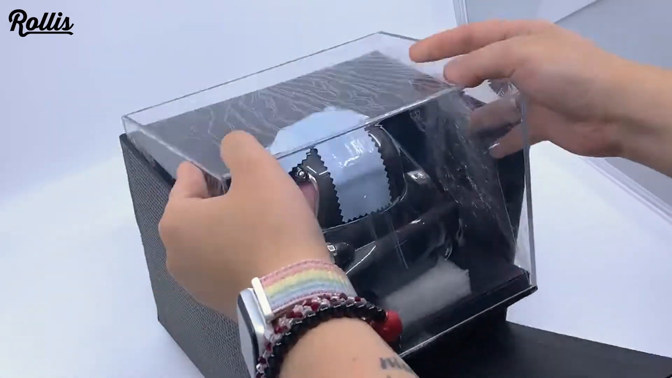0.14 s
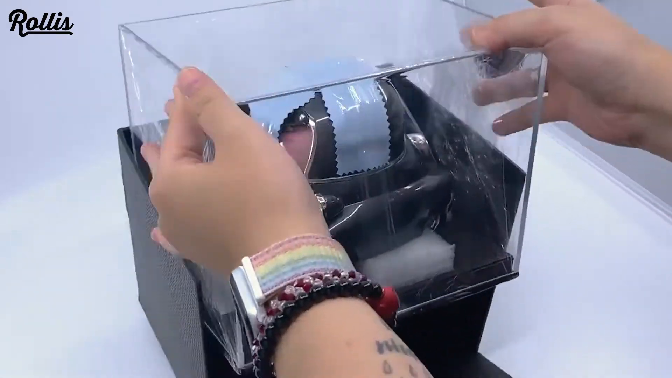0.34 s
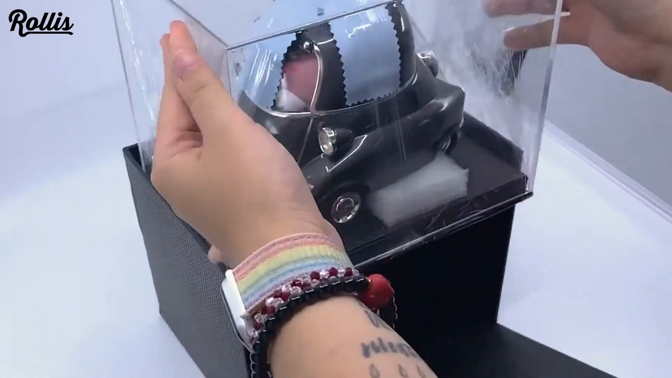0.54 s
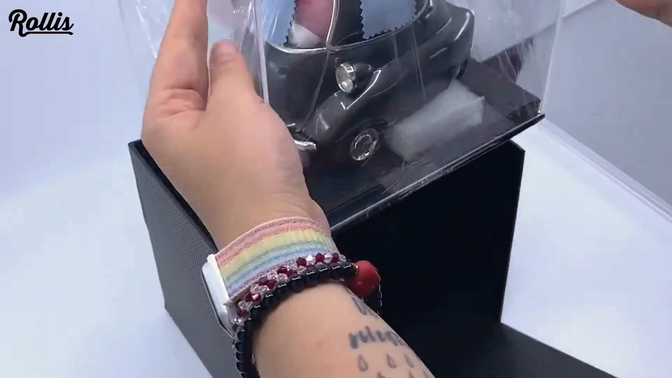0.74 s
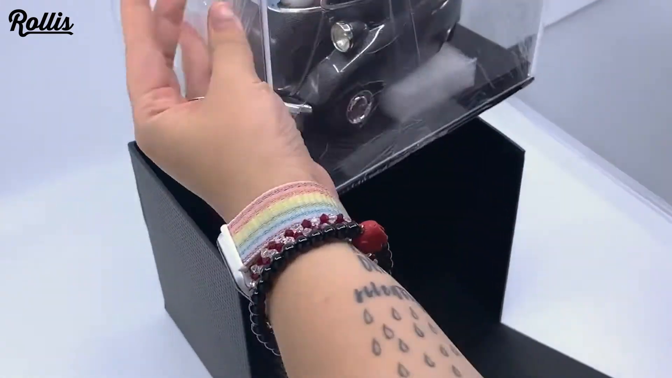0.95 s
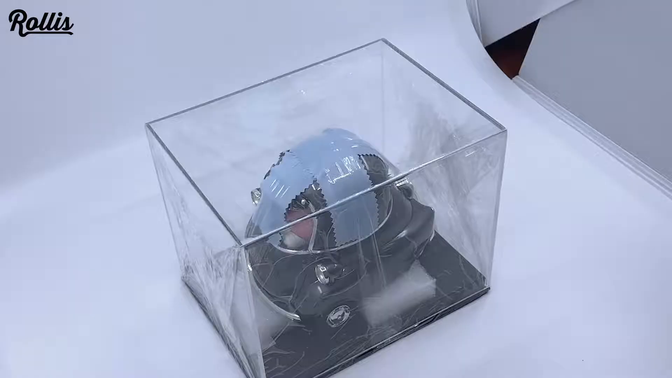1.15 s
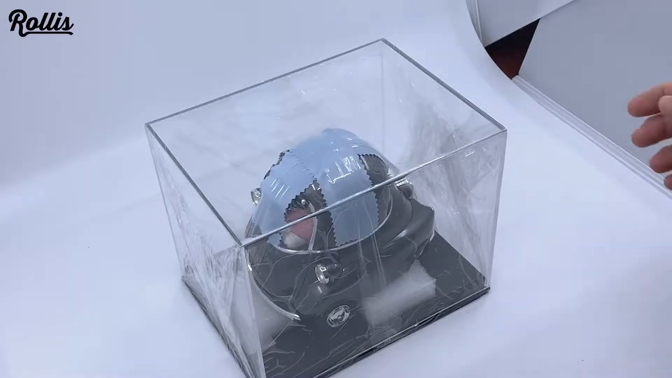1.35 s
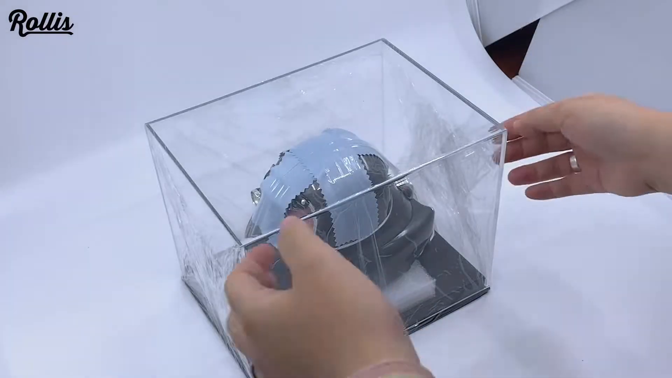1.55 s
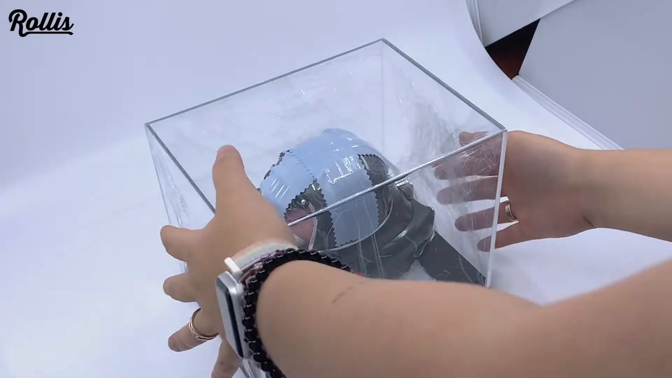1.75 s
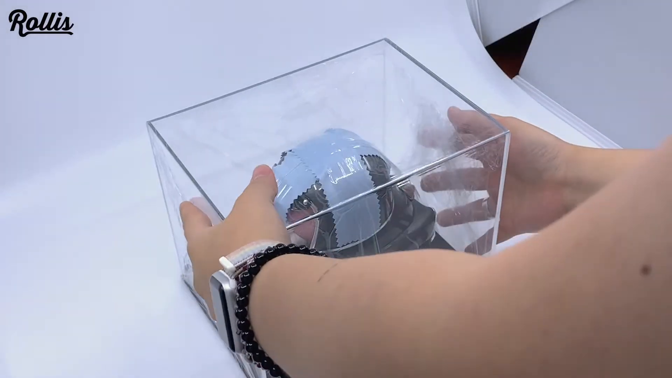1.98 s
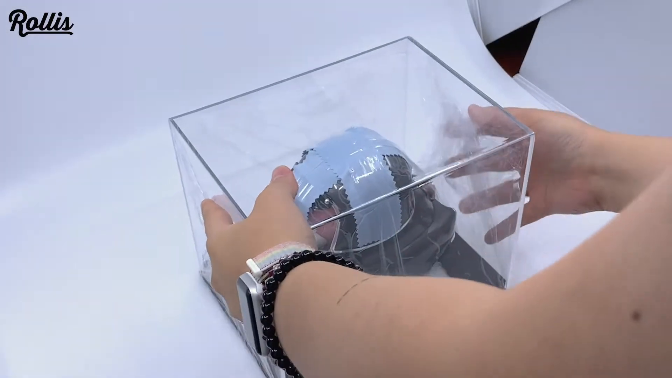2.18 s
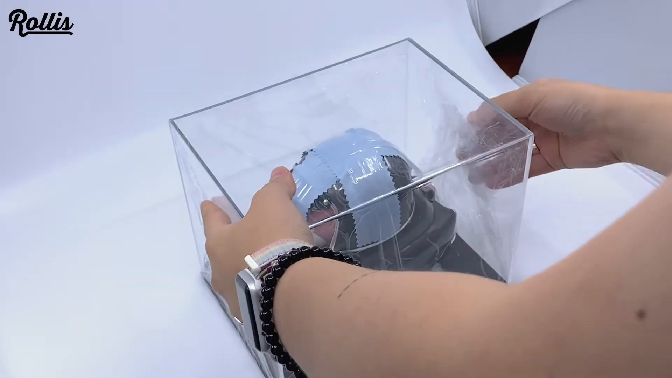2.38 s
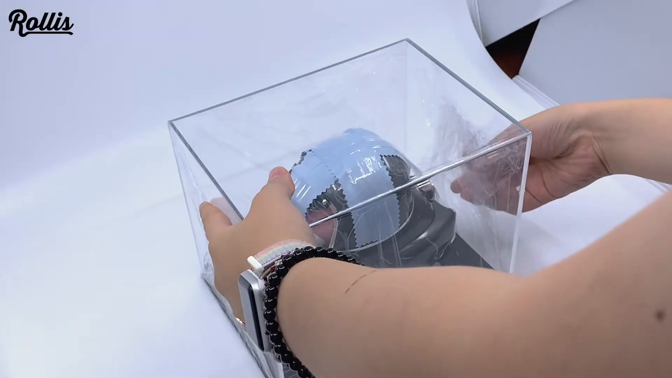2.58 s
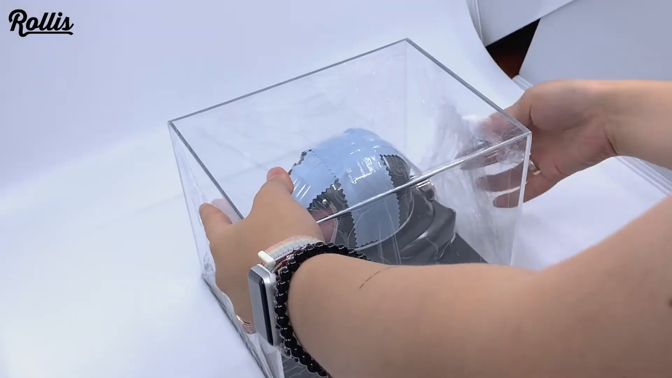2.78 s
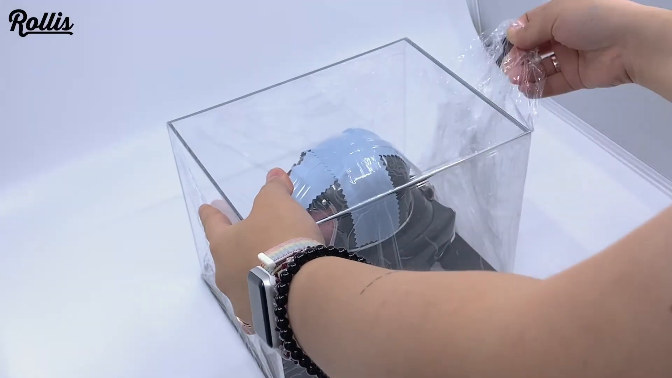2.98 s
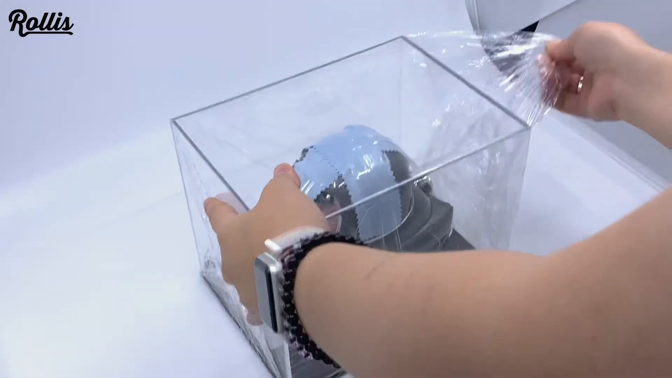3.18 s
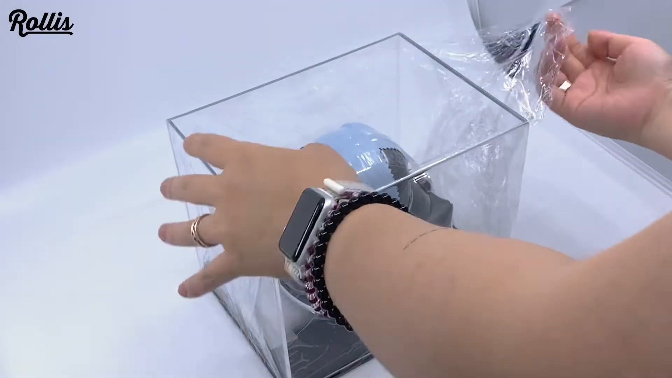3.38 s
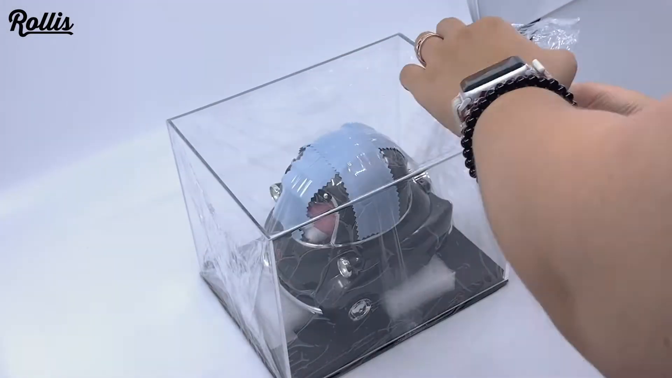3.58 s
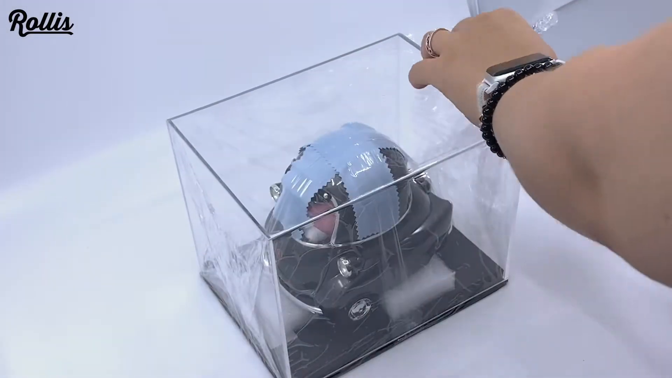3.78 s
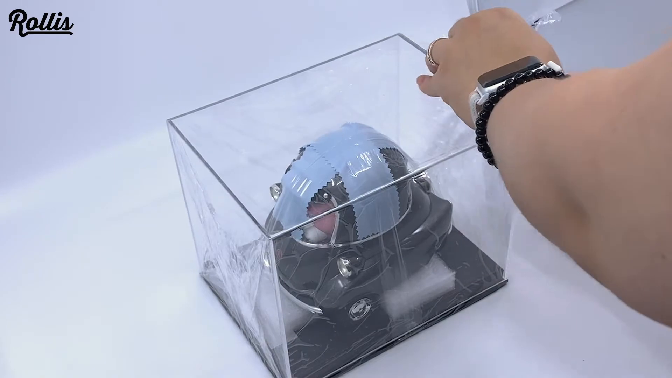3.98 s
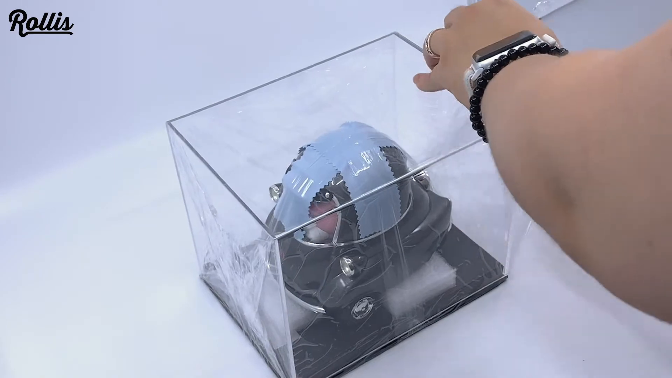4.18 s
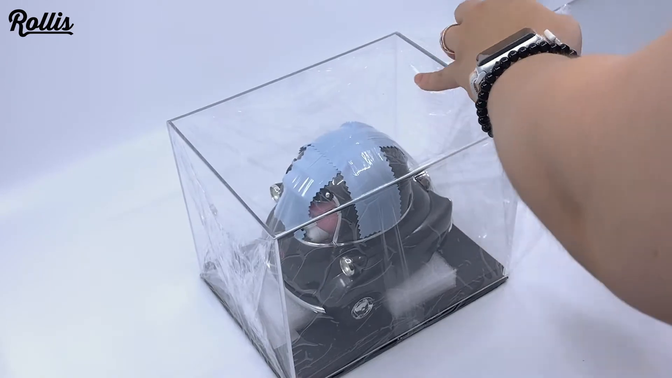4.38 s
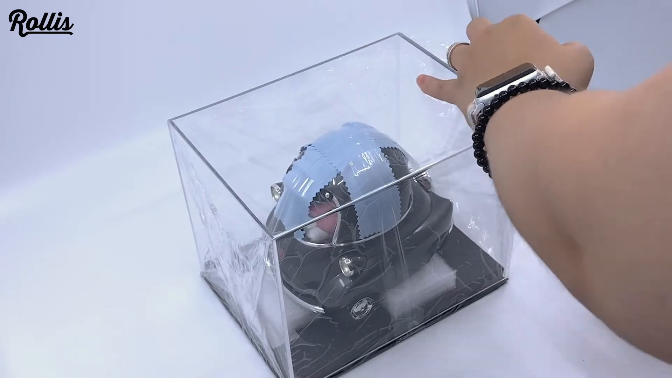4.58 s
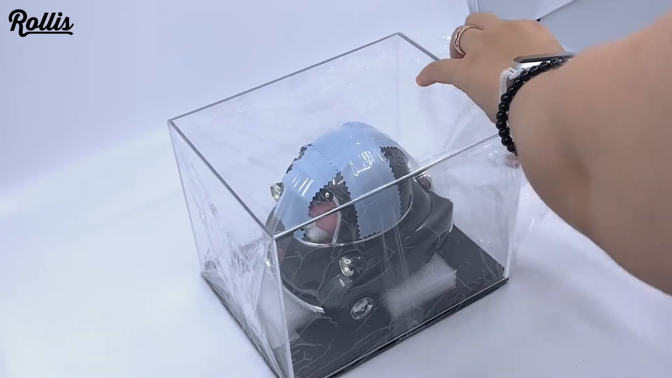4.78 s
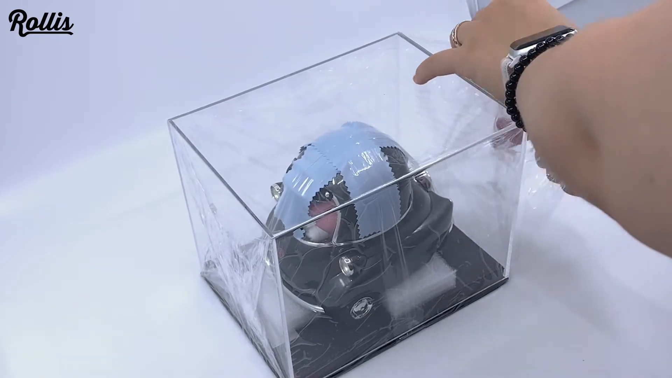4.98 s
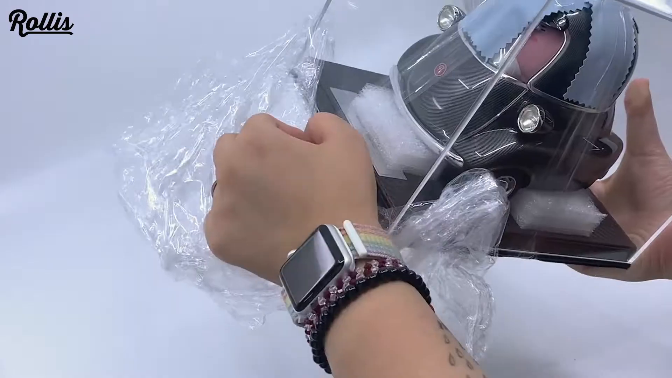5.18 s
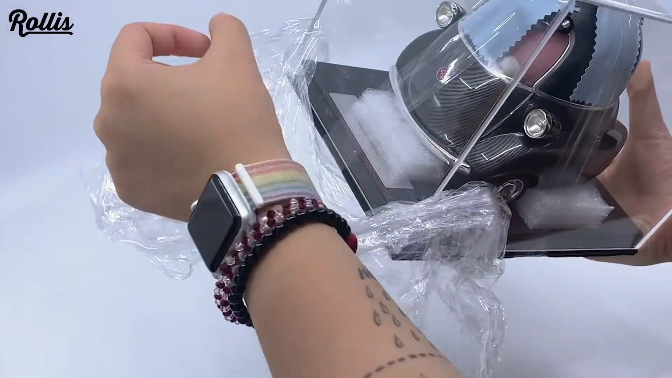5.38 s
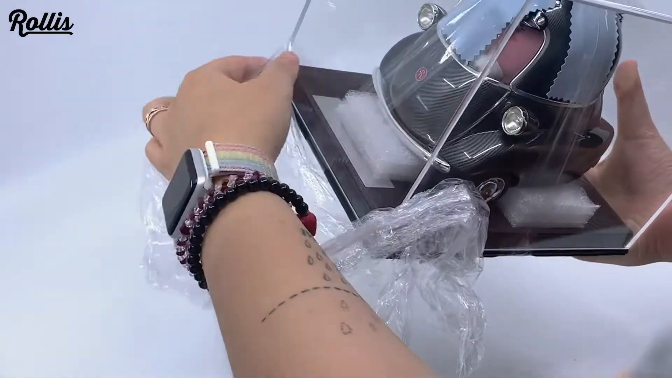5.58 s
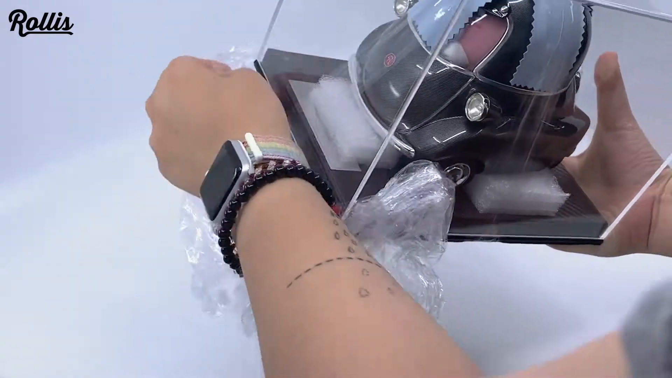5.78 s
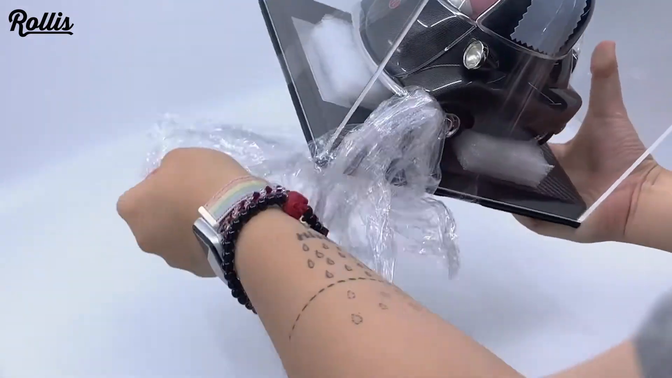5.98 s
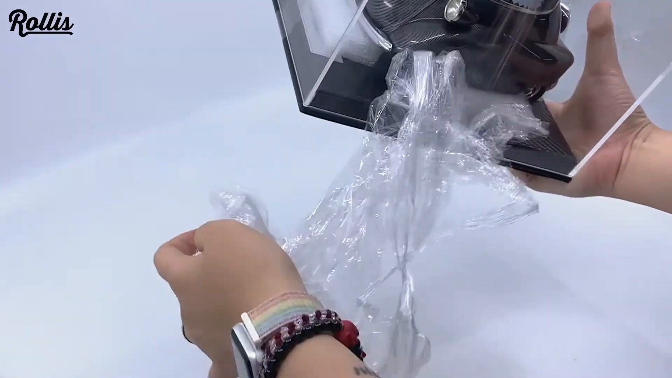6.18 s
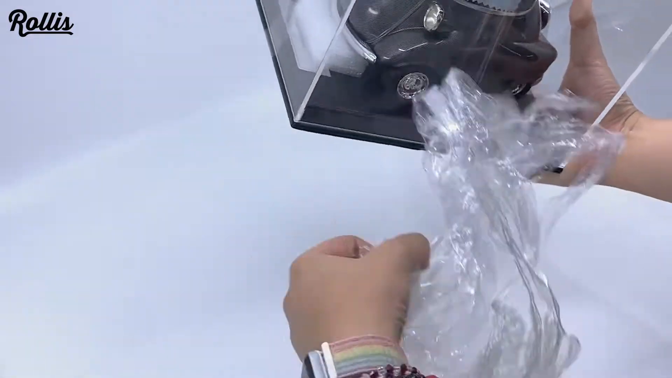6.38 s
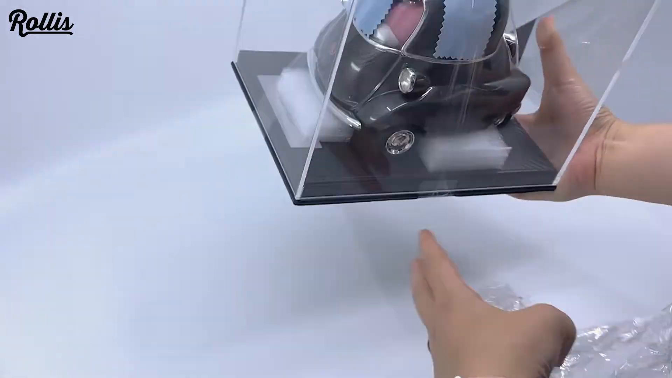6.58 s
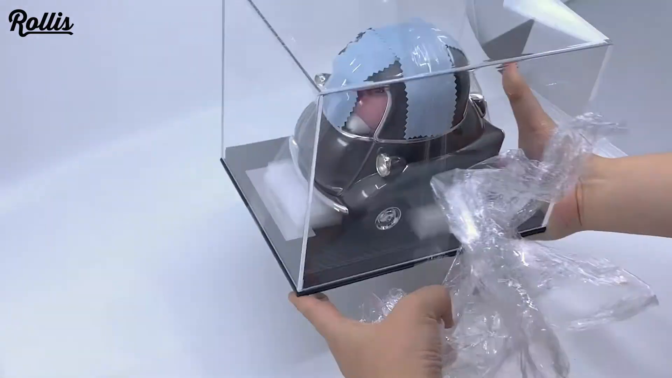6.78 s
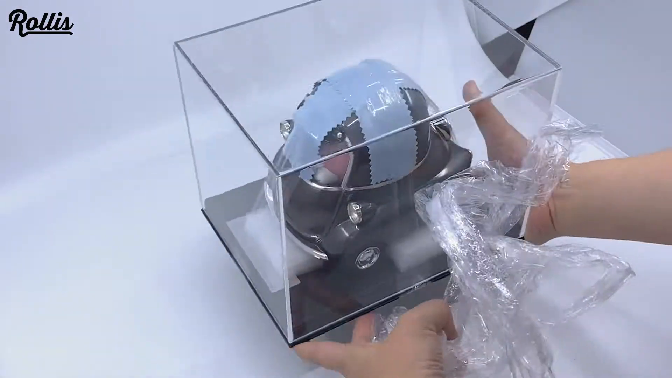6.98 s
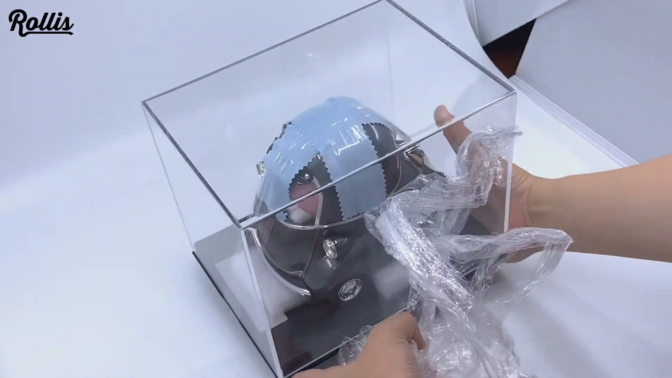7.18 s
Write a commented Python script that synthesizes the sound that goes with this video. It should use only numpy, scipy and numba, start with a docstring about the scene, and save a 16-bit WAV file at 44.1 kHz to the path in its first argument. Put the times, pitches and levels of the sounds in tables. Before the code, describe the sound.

Hollow knocks and scraping from a plastic case, followed by thin plastic film crackling as it is pulled off and bunched up.

```python
"""First come hollow knocks and scraping, as hands lift a hard plastic case out of a box close to a phone.
Then cling film is peeled off and bunched up: its creases snap in quick bursts of hiss, while blows
and tugs make the hollow case ring. A quiet room hums behind, and a deep drone comes and goes near the end.
The phone takes the high treble from its left microphone opening and plays it slightly later on the right."""
import sys
import numpy as np
from scipy import signal
from scipy.fft import rfft, irfft
from scipy.io import wavfile
from scipy.ndimage import uniform_filter1d
from numba import njit

SR = 44100
rng = np.random.default_rng(int(sys.argv[2]) if len(sys.argv) > 2 else 0)


def to_wav(sig):
    """Store sig (one row per channel, or 1-D mono) as 16-bit WAV at the path in sys.argv[1].

    Samples outside -1..1 are clipped; the rate is SR.
    """
    pcm = np.clip(np.atleast_2d(sig), -1, 1) * 32767
    pcm = np.round(pcm).astype(np.int16)
    wavfile.write(sys.argv[1], SR, pcm.T)  # frames by channels


N = 319725
T, HZ = np.arange(N) / SR, np.arange(N // 2 + 1) * SR / N + 1e-3

# The pull on the film, in five stretches. Each row: time in seconds, hiss level in dB.
FILM_PULL = [
    [(0.0, -48), (0.132, -53), (0.148, -48), (0.2, -56), (0.236, -50), (0.3, -52), (0.4, -49),
     (0.48, -48.5), (0.58, -49), (0.66, -54.5), (0.752, -59), (0.77, -63), (0.8, -48), (0.814, -48),
     (0.855, -52), (0.87, -51), (0.944, -62), (0.976, -46.5), (1.01, -55.5), (1.06, -48), (1.1, -50),
     (1.135, -53), (1.17, -50)],
    [(1.2, -85), (1.262, -72), (1.285, -58), (1.312, -68), (1.364, -58), (1.406, -69.5), (1.534, -68),
     (1.544, -63), (1.572, -63.5), (1.64, -59.5), (1.698, -63.5), (1.86, -82), (1.89, -60), (1.92, -58),
     (1.935, -70), (1.948, -67), (1.962, -52.5), (1.998, -69), (2.012, -52.5), (2.084, -51.5), (2.11, -65),
     (2.138, -75), (2.148, -60), (2.2, -42)],
    [(2.21, -46), (2.264, -46), (2.278, -33), (2.394, -35), (2.438, -53), (2.55, -38), (2.65, -50.5),
     (2.69, -37), (2.72, -52), (2.802, -28.5), (2.944, -21.5), (3.064, -25.5), (3.08, -21.5), (3.162, -19),
     (3.18, -30.5), (3.3, -44), (3.374, -30), (3.44, -42.5), (3.52, -59), (3.6, -69)],
    [(3.62, -43.5), (3.734, -31.5), (3.765, -33.5), (3.79, -31), (3.84, -31), (3.9, -26), (3.935, -31.5),
     (3.985, -27), (4.025, -32), (4.1, -26), (4.154, -36.5), (4.204, -27), (4.36, -34), (4.436, -35.5),
     (4.454, -27), (4.472, -31), (4.514, -29), (4.545, -26.5), (4.595, -34.5), (4.63, -32), (4.655, -40),
     (4.68, -34), (4.776, -35), (4.792, -36.5), (4.83, -40), (4.864, -33), (4.888, -36.5), (4.936, -33.5),
     (4.96, -48), (4.968, -37.5), (5.0, -33)],
    [(5.02, -35.5), (5.08, -36.5), (5.172, -29.5), (5.185, -35.5), (5.24, -34), (5.26, -25), (5.47, -43),
     (5.59, -40), (5.65, -39), (5.72, -31.5), (5.75, -38.5), (5.83, -24), (5.865, -29), (5.92, -33.5),
     (5.96, -27), (5.98, -29), (6.09, -32.5), (6.105, -37.5), (6.128, -40), (6.14, -31.5), (6.21, -31),
     (6.3, -36), (6.44, -30.5), (6.55, -40), (6.57, -35.5), (6.66, -37.5), (6.69, -39.5), (6.75, -46),
     (6.77, -44), (6.8, -46), (6.82, -47), (6.875, -52), (6.9, -51.5), (6.97, -53.5), (7.0, -55),
     (7.1, -52.5), (7.12, -41.5), (7.19, -53), (7.22, -52), (7.25, -65)],
]
# How dull the film sounds. Each row: time in seconds, then rustle and folds in dB against the hiss.
FILM_DULLNESS = [(0, -9.5, 6), (.45, -4, -17), (.57, -4, 6), (.7, -8.5, -28), (.9, -6.5, -49),
                 (1.2, -8.5, -7), (1.6, -3, 2), (2.1, -14, -25), (2.3, -9, -18.5), (2.5, -6, -12.5),
                 (2.7, -5.5, -14), (2.9, -3.5, -11.5), (3.2, -5.5, -13), (4, -6.5, -7.5), (4.6, -7, -12.5),
                 (5.2, -7, -8.5), (6, -7.5, -10.5), (6.6, -6.5, -8), (7.25, -8, -7)]
# A boost or cut to the film around 6800 Hz. Each row: time in seconds, change in dB.
FILM_LOWER_TREBLE = [(0, 0), (.6, -0.5), (1.1, -0.5), (1.3, -5), (1.55, -8), (1.8, -1.5), (2.05, -1),
                     (2.5, 1), (3.2, -1), (4, 1), (5, 0), (6, -1), (6.7, 1), (7.25, -2.5)]
# Loud creases. Each row: start in seconds, level in dB, rustle and folds in dB against that level,
# fade time in seconds. A fade time (t60) is how long a sound takes to drop by 60 dB.
LOUD_SNAPS = [(0.1371, -33, -18.5, -26, 0.28), (0.159, -28, -21, -28, 0.098),
              (0.21, -29.5, -25, -32, 0.064), (0.776, -39, -27, -24, 0.062), (0.808, -28.5, -36, -35, 0.18),
              (0.8614, -39, -28, -36, 0.17), (0.974, -36, -29, -18, 0.07), (1.1438, -29, -17, -29, 0.11),
              (1.3274, -45, -31, -21, 0.088), (1.344, -38.5, -30, -20, 0.13), (1.544, -33, -40, -30, 0.043),
              (1.961, -42, -14, -30, 0.044), (2.1475, -41, -39, -34, 0.08), (2.2753, -20, -23, -30, 0.15),
              (2.2957, -21, -34, -23, 0.08), (2.349, -21.5, -15, -26, 0.22), (2.386, -31, -25, -12, 0.08),
              (2.456, -33, -34, -37, 0.11), (2.5276, -23.5, -20, -31, 0.11), (2.55, -23.5, -15, -39, 0.29),
              (2.6297, -26, -18, -22, 0.084), (2.6673, -19.5, -17, -17, 0.067),
              (2.6853, -17, -16.5, -23, 0.13), (2.759, -25, -25, -36, 0.097),
              (2.7784, -19.5, -9.5, -28, 0.14), (2.7978, -26, -5, -3.5, 0.08),
              (2.8192, -15.5, -10.5, -28, 0.26), (2.88, -16, -19, -8.5, 0.2), (2.902, -11, -26, -20, 0.2),
              (2.966, -12.5, -11, -14.5, 0.21), (3.014, -17, -13, -19, 0.054),
              (3.0789, -11, -12, -12.5, 0.29), (3.138, -15.5, -6, -8.5, 0.13),
              (3.1475, -12.5, -2, -15, 0.058), (3.195, -18, -27, -29, 0.072), (3.2914, -41, -19, -21, 0.07),
              (3.3588, -52, -18, -33, 0.17), (3.448, -29, -15, -19, 0.088), (3.5369, -43, -14, -29, 0.067),
              (3.55, -29.5, -16, -21, 0.042), (3.6042, -43, -12, -10, 0.08), (3.62, -35, -16, -10.5, 0.12),
              (3.6353, -27, -18, -25, 0.085), (3.656, -30, -16, -28, 0.08), (3.716, -18, -24, -31, 0.098),
              (3.7726, -15, -33, -22, 0.13), (3.8658, -17, -15, -22, 0.26), (3.9, -15.5, -22, -21, 0.061),
              (3.942, -17.5, -10, -16, 0.16), (3.9695, -12.5, -16, -8.5, 0.093),
              (4.007, -15, -16, -11, 0.04), (4.0319, -8.5, -15, -41, 0.18),
              (4.0918, -11.5, -15.5, -23, 0.096), (4.137, -23, -9, -11, 0.088),
              (4.1583, -20.5, -11, -17, 0.087), (4.1806, -16, -13, -11.5, 0.08),
              (4.2004, -14.5, -14, -15.5, 0.18), (4.253, -14, -10, -25, 0.053),
              (4.268, -19, -7, -24, 0.032), (4.3272, -17.5, -13, -13.5, 0.06), (4.375, -29, -12, -16, 0.17),
              (4.4416, -16, -12, -15, 0.071), (4.4774, -20, -26, -25, 0.1), (4.5068, -16, -37, -28, 0.38),
              (4.573, -13, -31, -33, 0.058), (4.611, -15, -17, -18, 0.25), (4.6667, -20.5, -10, -18, 0.11),
              (4.7092, -31, -13, -16, 0.089), (4.7875, -16, -19, -26, 0.11), (4.7785, -36, -32, -37, 0.14),
              (4.841, -34, -13, -24, 0.08), (4.8571, -21.5, -18, -21, 0.082), (4.964, -31, -27, -30, 0.095),
              (5.0537, -18.5, -33, -35, 0.049), (5.1392, -22.5, -12, -15, 0.16),
              (5.2034, -13.5, -8.5, -10, 0.041), (5.2533, -10.5, -35, -37, 0.057),
              (5.272, -9.5, -27, -20, 0.13), (5.354, -32, -22, -22, 0.062), (5.5516, -24, -18, -19.5, 0.47),
              (5.579, -18.5, -20, -19, 0.11), (5.6447, -34.5, -23, -9, 0.25), (5.6654, -23, -26, -14, 0.45),
              (5.6955, -21, -20, -9, 0.12), (5.7154, -20, -22, -23, 0.088), (5.7414, -23, -24, -31, 0.093),
              (5.788, -17, -25, -37, 0.1), (5.8125, -7, -14.5, -25, 0.057),
              (5.8244, -5.5, -14.5, -17.5, 0.048), (5.8356, -6.5, -10, -18, 0.037),
              (5.841, -10.5, -17, -26, 0.087), (5.9364, -40, -30, -24, 0.062), (5.948, -11, -16, -19, 0.06),
              (5.9525, -6.5, -17, -20.5, 0.059), (5.958, -4, -17, -22, 0.03), (5.9654, -19, -7, -11, 0.05),
              (6.131, -24, -31, -27, 0.12), (6.3013, -27.5, -22, -7.5, 0.1),
              (6.3607, -19.5, -25, -21, 0.14), (6.4406, -17.5, -19, -17.5, 0.19),
              (6.564, -25, -16, -17, 0.27), (6.6723, -18, -17, -20.5, 0.083), (6.757, -29, -18, -31, 0.066),
              (6.8052, -27, -21, -21, 0.11), (6.851, -33, -27, -24, 0.046), (6.8833, -30.5, -30, -16, 0.04),
              (6.9782, -31.5, -28, -10, 0.043), (7.1102, -44, -25, -20, 0.08),
              (7.1207, -30, -24, -15, 0.16), (7.195, -38, -27, -23, 0.13)]
# Dry ticks of single creases. Each row: start in seconds, peak level in dB.
CREASE_TICKS = [(0.088, -35), (0.1375, -35), (0.161, -23), (0.211, -27), (0.742, -39), (0.775, -37),
                (0.807, -29), (0.862, -30), (0.9125, -40), (1.149, -25), (1.3275, -37), (1.3458, -38),
                (1.5437, -32), (1.548, -32), (1.6238, -46), (1.64, -46), (1.659, -42), (1.892, -53),
                (1.961, -39), (1.9823, -48), (2.1485, -38), (2.297, -21), (2.4574, -28), (2.631, -27),
                (2.687, -22), (3.08, -7), (3.4485, -29), (3.5372, -42), (3.55, -37), (3.621, -33),
                (3.7755, -15), (4.0095, -14), (4.2563, -15), (4.2715, -18), (4.4425, -17), (4.651, -24),
                (4.779, -23), (4.9655, -29), (5.0538, -21), (5.2046, -17), (5.2533, -9), (5.2722, -12),
                (5.328, -20), (5.4857, -28), (5.531, -25), (5.6276, -26), (5.6663, -22), (5.7165, -13),
                (5.7562, -21), (5.7806, -17), (5.792, -12), (5.816, -13), (5.824, -8), (5.9586, -9),
                (6.132, -25), (6.6737, -17), (6.7575, -25), (6.7617, -24), (6.807, -28), (6.8527, -30),
                (6.884, -29), (6.9565, -36), (6.9794, -31), (7.038, -37), (7.111, -34), (7.1236, -26),
                (7.196, -35), (7.218, -34)]
# The walls of the case colour the folds. Each row: pitch in Hz, width in Hz, strength in dB.
WALL_RESONANCES = [(623, 99, 0), (898, 25, 23), (1075, 34, 20), (1243, 354, 26), (1750, 500, 23),
                   (1794, 45, 21.5), (2167, 20, 17)]
# Blows and tugs on the case. Each row: start in seconds, level in dB, favoured pitch in Hz,
# drop away from that pitch in dB per octave, damping (1 rings freely, more dies sooner), rise in seconds,
# clack and deep thud in dB against the level, left minus right in dB.
CASE_KNOCKS = [(0.027, -25.5, 1500, 22, 1.3, 0.00096, -6.5, -40, -6),
               (0.03, -16.5, 209, 15.5, 1.03, 0.0025, -20, -33, -3),
               (0.136, -29, 350, 26, 0.81, 0.0048, -25, -20, 3),
               (0.152, -23.5, 326, 4.5, 3.4, 0.017, -30.5, -17, -3),
               (0.263, -25.5, 163, 12.5, 1.26, 0.0036, -14.5, -11, 2),
               (0.353, -28, 487, 17, 1.7, 0.0029, -9, -23, -5),
               (0.377, -43, 1070, 30, 1.5, 0.0016, -13, -30, -2),
               (0.376, -25, 286, 7, 0.66, 0.0042, -26, -27, -3.5),
               (0.418, -27, 420, 12, 1.6, 0.0016, -17, -25, -6),
               (0.424, -24.5, 300, 20, 1.7, 0.0037, -19, -16, -4),
               (0.562, -37, 400, -7, 1.2, 0.007, -4, -20, -6),
               (0.602, -29.5, 304, 7, 0.96, 0.0056, -9, -15, -7),
               (0.688, -34, 493, 48, 0.18, 0.0069, -10, -15, -6),
               (0.7405, -18, 495, 60, 1.23, 0.003, -22.5, -28, -5),
               (0.742, -20, 258, 6, 1.26, 0.0031, -31, -27, 2),
               (0.778, -36, 488, 60, 0.7, 0.0046, -26, -10, -6),
               (0.806, -39.5, 488, 60, 0.65, 0.004, -26, -15, -8),
               (1.149, -32.5, 206, 28, 2.3, 0.0035, -33, -12, -1),
               (2.204, -35.5, 300, 3, 1.5, 0.0018, -7.5, -20, 3),
               (2.221, -31, 180, 16, 1.35, 0.0011, -35, -4.5, 2),
               (2.227, -25.5, 91.5, 16, 3, 0.0013, -41, -11, -2),
               (2.624, -26.5, 370, 39, 0.33, 0.0028, -10, -24, 6),
               (2.642, -14.5, 349, 39, 1.3, 0.004, -28, -37, 3),
               (2.657, -27, 205, 40, 0.74, 0.004, -30, -30, 2),
               (2.674, -29, 380, 30, 0.91, 0.0033, -20, -30, 4),
               (2.673, -23.5, 233, 36, 0.9, 0.0018, -15, -14, 1.5),
               (2.841, -25.5, 310, 23, 0.93, 0.003, 2, -36, -2),
               (2.88, -32, 314, 13, 2, 0.0021, -14, -29, -11),
               (2.941, -26, 380, 36, 0.72, 0.0043, 7.5, -39, 1),
               (2.976, -50, 382, 14, 0.74, 0.003, 2, -34, 1),
               (3.077, -24.5, 360, 22, 0.56, 0.0041, -16, -35, 3),
               (3.149, -8.5, 410, 7, 1, 0.00086, -10, -35, -1.5),
               (3.1505, -19, 610, 4, 0.76, 0.0013, -14, -32, -3),
               (3.207, -3, 156, 11.5, 1.3, 0.0023, -27, -10, 1.5),
               (3.224, -14, 119, 9, 2.8, 0.0032, -30, -16, 10),
               (3.264, -17.5, 162, 15, 0.95, 0.0038, -32, -27, -5),
               (3.288, -20.5, 113, 18, 0.31, 0.0016, -47, -25, 2),
               (3.33, -27, 160, 15.5, 0.8, 0.0045, -40, -20, 0),
               (3.38, -32.5, 200, 12, 0.8, 0.005, -35, -20, 0),
               (3.75, -35, 423, 21, 1.5, 0.0039, 6, -18, -0.5),
               (3.874, -25.5, 292, 7, 1.4, 0.0025, -7, -27, -4),
               (3.972, -30, 334, 17, 1.5, 0.0036, -3, -30, 0),
               (4.035, -23.5, 291, -0.5, 0.27, 0.0029, -12, -27, -2),
               (4.07, -27, 920, 18, 1, 0.003, -15, -30, -2),
               (4.089, -26, 314, 6, 0.87, 0.0033, -10, -29, 0),
               (4.177, -20.5, 218, 2, 1.3, 0.0038, -31, -28, 1),
               (4.219, -29, 470, 10, 0.62, 0.0042, -6, -8, 0),
               (4.382, -20.5, 376, 14, 4.4, 0.0017, -21, -23, 0),
               (4.531, -31, 360, 12, 1.5, 0.0026, -15, -25, 0),
               (4.569, -32, 420, 12, 1.7, 0.003, -13, -27, -2),
               (4.673, -38, 316, 18, 0.65, 0.0033, -3, -28, -2.5),
               (4.728, -30, 293, 14, 0.82, 0.0038, -8, -16, -3),
               (4.752, -27.5, 300, 12, 1.7, 0.0022, -22, -18, 0),
               (4.769, -40, 132, 4, 1.2, 0.0026, -6, -11, -0.5),
               (5.273, -32, 560, 9, 0.84, 0.0062, 0, -29, -2.5),
               (5.83, -31.5, 353, 21, 0.37, 0.0041, -15, -25, 2),
               (5.951, -24.5, 330, 6, 1.6, 0.0044, -12, -21, -1),
               (6.435, -32, 346, 27, 0.64, 0.0042, -14, -26, -1.5)]
# The tones the case rings at. Each row: pitch in Hz, strength in dB, fade time in seconds.
CASE_TONES = [(60, -50, 0.15), (107.2, -11.5, 0.2), (151, -3.5, 0.23), (201, -1.5, 0.16),
              (313.3, 6.5, 0.093), (347.1, 7, 0.083), (398, 8, 0.059), (486.6, 5.5, 0.076),
              (552, -0.5, 0.11), (613, -3, 0.053), (921, 5.5, 0.042), (1074, 2, 0.053), (1224, -7, 0.061),
              (1476, -2, 0.043), (1770, 3, 0.026), (2320, -2, 0.027)]
# Hands dragging on the case. Each row: time in seconds, hollow rumble in dB, deep rumble in dB,
# favoured pitch in Hz.
HAND_DRAG = [(0.0, -46, -44, 267), (0.32, -52, -48, 238), (0.34, -46, -40.5, 332), (0.62, -44, -46.5, 310),
             (0.77, -50, -53, 467), (0.97, -59.5, -57, 223), (1.9, -61, -58, 225), (2.5, -58.5, -50.5, 260),
             (2.99, -39.5, -77, 376), (3.15, -46, -62, 393), (3.23, -35.5, -48, 229),
             (3.39, -42.5, -33.5, 245), (3.55, -59, -45, 219), (3.74, -49.5, -47, 364),
             (4.1, -39.5, -68, 360), (4.64, -44.5, -55, 370), (5.57, -52, -54, 288.5),
             (5.86, -47, -62, 350), (6.16, -52, -51, 292), (6.46, -48.5, -53, 343), (6.97, -56.5, -56, 265),
             (7.25, -60, -51, 252)]
# The tone colours of six noises. Each row: frequency in Hz, relative strength in dB.
HISS_COLOUR = [(4500, -66), (5800, -2.5), (7500, 2), (9300, -3.5), (11000, 1), (13000, -1.5), (16000, -4.5)]
RUSTLE_COLOUR = [(2000, -5), (2700, -0.5), (4000, 4.5), (5400, 4.5), (6500, -7.5)]
FOLD_COLOUR = [(400, 20.5), (700, 9), (1100, -6), (1800, 0), (2500, 18.5), (3400, 11)]
SCRAPE_COLOUR = [(400, -6.5), (600, 3), (1000, -5.5), (1500, -2.5), (2200, -9.5), (3200, -20.5)]
DEEP_COLOUR = [(20, -34), (35, 0), (55, 15.5), (80, 8), (110, 13), (160, -35.5)]
ROOM_COLOUR = [(18, -50), (30, -10), (138, -5), (211, -5), (344, -6.5), (612, -20.5), (1620, -23),
               (2020, -36), (2760, -27.5), (3450, -40), (6000, -38), (7800, -76), (13200, -120)]
# Thin high tones in the room. Each row: pitch in Hz, level at its loudest in dB.
WHINE_TONES = [(6121, -90), (6525, -74)]
# A deep drone. Each row: start, end of the swell and stop in seconds, pitch in Hz, full level in dB.
DRONE_SPANS = [(5.4, 6.2, 6.42, 54.7, -41), (6.8, 7.104, 8.7, 60.5, -50)]
# How the phone's two microphone openings (ports) differ. Each row: frequency in Hz, left minus right in dB.
PORT_BALANCE = [(60, .5), (200, 0), (380, -0.5), (700, -7), (1290, -2), (2380, -2), (4400, 1), (8000, 3)]

DIP_START_S, DIP_END_S = 1.174, 1.197  # the whole sound almost vanishes for a moment


def film():
    """Cling film under pull: snapping creases let out bursts of hiss, softer rustle and dull folds."""
    (pull_db,), (rustle_db, folds_db) = curves(*FILM_PULL), curves(FILM_DULLNESS)
    small = creases(per_s=900, spread_db=2.0, t60=0.003, calm=1.2)
    large = creases(per_s=80, spread_db=1.5, t60=0.049, calm=4.4)
    hiss = film_hiss()
    rustle = shimmer(film_rustle(), depth_db=3.8)
    hiss = hiss.std() * shimmer(hiss, depth_db=2.5)
    folds = shimmer(folds_and_scrape(), depth_db=3.0)
    crinkle = np.sqrt(small * large) * hiss
    crinkle += undb(rustle_db) * small ** 0.033 * large ** 0.066 * rustle
    crinkle += undb(folds_db) * large * folds
    out = undb(pull_db) * crinkle + snaps(hiss, rustle, folds)
    lower_treble = irfft(rfft(out) / (1 + ((HZ - 6800) / 1700) ** 4), N)
    return out + (undb(curves(FILM_LOWER_TREBLE)[0]) - 1) * lower_treble


def creases(per_s, spread_db, t60, calm):
    """Power of random snaps, each sudden and fading; the pull shares a steady total among them."""
    hits = (rng.random(N) < per_s / SR) * undb(2 * spread_db * rng.exponential(size=N))
    decay = np.exp(-2 * np.log(1000) / (t60 * SR))
    power = signal.lfilter([1 - decay], [1, -decay], hits)
    power = power + calm * uniform_filter1d(power, size=2000) + 1e-9  # calm fills the gaps
    return power / uniform_filter1d(power, size=2000)


def film_hiss():
    """Bright, gritty hiss whose middle flares on its own as other patches of film go taut."""
    rings = patches(count=14000, low_hz=6000, high_hz=15000, cycles=12, spread_db=2.2)
    hiss = noise(shape(HISS_COLOUR), alike_hz=1500) + undb(-23.5) * rings
    flare = creases(per_s=25, spread_db=2.0, t60=0.2, calm=0.5)
    return hiss + undb(-6.5) * np.sqrt(flare) * noise(bump(8800, width_hz=3000), alike_hz=1500)


def film_rustle():
    """Larger patches crackle lower as the film unsticks."""
    return rasp(shape(RUSTLE_COLOUR), alike_hz=1100,
                count=9000, low_hz=1900, high_hz=6500, cycles=8, spread_db=2.6)


def folds_and_scrape():
    """The dull part: cardboard scrapes as the case leaves the box, then film folds against its walls."""
    walls = sum(undb(db) * bump(hz, width_hz) for hz, width_hz, db in WALL_RESONANCES)
    folds = rasp(shape(FOLD_COLOUR) * (1 + 5.1 * walls), alike_hz=1400,
                 count=7000, low_hz=450, high_hz=3200, cycles=6, spread_db=2.0)
    scrape = noise(shape(SCRAPE_COLOUR), alike_hz=1200)
    return np.where(T < DIP_END_S, scrape, folds)


def rasp(colour, alike_hz, **patch_settings):
    """Smooth noise mixed with ringing patches of film, both given the same colour."""
    smooth = noise(colour, alike_hz)
    grit = irfft(rfft(patches(**patch_settings)) * colour, N)
    return 0.75 * smooth + 0.65 * grit / grit.std()


def patches(count, low_hz, high_hz, cycles, spread_db):
    """Taut patches of film ring for a few cycles when a crease gives way; the level is kept even."""
    when, pitch, length, strength, side = rng.random((count, 5)).T
    hz = low_hz * (high_hz / low_hz) ** pitch
    size = undb(-spread_db * np.log(1 - strength)) * np.sqrt(hz)
    start, lag = (when * N).astype(np.int64), (24 * side - 12).astype(np.int64)  # in samples
    out = pings(start, hz, cycles * (0.5 + length), size, lag)
    return out / np.sqrt(uniform_filter1d(np.mean(out ** 2, axis=0), size=3000) + 1e-12)


@njit
def pings(start, hz, cycles, size, lag):
    """Short fading rings; each reaches the right port a little before or after the left."""
    out = np.zeros((2, N + 4096))
    for k in range(len(start)):
        step = np.exp(2j * np.pi * hz[k] / SR - 3 * hz[k] / (cycles[k] * SR))
        wave = size[k] + 0j
        for i in range(min(int(2 * cycles[k] * SR / hz[k]), 4000)):
            out[0, start[k] + 16 + i] += wave.imag
            out[1, start[k] + 16 + lag[k] + i] += wave.imag
            wave *= step
    return out[:, :N]


def shimmer(sound, depth_db):
    """Narrow bands of the noise flicker at random every few hundredths of a second: a faint shimmer."""
    spectrum = signal.stft(sound, nperseg=1024)[2]
    flicker = uniform_filter1d(rng.standard_normal(spectrum.shape[1:]), size=2, axis=0)  # across pitch
    flicker = uniform_filter1d(flicker, size=5, axis=1)  # across time
    out = signal.istft(spectrum * undb(depth_db * flicker / flicker.std()), nperseg=1024)[1][:, :N]
    return out / out.std()


def snaps(hiss, rustle, folds, rise_s=0.0016, tick_db=-1, tick_t60=0.0081):
    """A loud crease gives way with a sharp tick, then a fading burst of the film's three sounds."""
    out = np.zeros((2, N))
    for start_s, level_db, rustle_db, folds_db, t60 in LOUD_SNAPS:
        i = int(start_s * SR)
        age = T[:min(8000, N - i)]
        piece = slice(N - i - len(age), N - i)  # noise borrowed from another moment
        crack = undb(-9.5) * hiss[:, piece]  # leaves room for the peaks of the hiss
        burst = crack + undb(rustle_db) * rustle[:, piece] + undb(folds_db) * folds[:, piece]
        fade = undb(-60 * age / t60) * (1 - np.exp(-age / rise_s))
        tick = undb(tick_db - 60 * age / tick_t60) * crack
        out[:, i:i + len(age)] += undb(level_db) * (tick + fade * burst)
    return out


def ticks(t60=0.004):
    """Single creases give tiny bright bursts that die in a few milliseconds, alike at both ports."""
    out, age = np.zeros(N + 400), T[:400]
    bright = signal.butter(3, [6500, 15900], "band", fs=SR)
    for start_s, peak_db in CREASE_TICKS:
        tick = signal.lfilter(*bright, rng.standard_normal(len(age)) * undb(-60 * age / t60))
        i = int(start_s * SR)
        out[i:i + len(age)] += undb(peak_db) * tick / abs(tick).max()
    return out[:N]


def knocks(clack_t60=0.1, thud_t60=0.35):
    """Each blow rings the tones of the hollow case, with a clack on top and a deep thud below."""
    out, age = np.zeros((4, 2 * N)), T[:SR // 5]
    hz, db, t60 = np.transpose(CASE_TONES)[:, :, None]
    for start_s, level_db, pitch_hz, focus_db, damping, rise_s, clack_db, thud_db, pan_db in CASE_KNOCKS:
        detune, strength, phase = rng.standard_normal((3, len(CASE_TONES), 1))
        swell = (1 - np.exp(-age / rise_s)) ** 2 * (1 - age / age[-1])
        tone_db = db - focus_db * abs(np.log2(hz / pitch_hz)) + 1.2 * strength
        tones = np.sin(2 * np.pi * hz * (1 + 0.008 * detune) * age + 0.4 * phase)
        fade = undb(-60 * age * max(damping, 0.2) / t60)
        body = swell * np.sum(undb(tone_db) * fade * tones, axis=0)
        body = body / abs(body).max() * undb(np.array([[0.5], [-0.5]]) * pan_db)
        clack = swell * undb(clack_db - 60 * age / clack_t60)
        thud = swell * undb(thud_db - 60 * age / thud_t60)
        i = int(start_s * SR)
        out[:, i:i + len(age)] += undb(level_db) * np.vstack([body, clack, thud])
    left, right, clack, thud = out[:, :N]
    clacks = clack * noise(shape(SCRAPE_COLOUR), alike_hz=1200)
    thuds = thud * noise(shape(DEEP_COLOUR), alike_hz=500)
    return np.array([left, right]) + clacks + thuds


def drag():
    """Skin and film judder against the case, keeping its tones near the favoured pitch murmuring."""
    hollow_db, deep_db, pitch_hz = curves(HAND_DRAG)
    judder = creases(per_s=80, spread_db=1.5, t60=0.033, calm=0.7)
    rub = np.sqrt(judder) * noise(HZ > 150, alike_hz=750)
    hollow, power = 0, 0
    for hz, db, t60 in CASE_TONES[2:]:
        share = undb(db - 7 * abs(np.log2(hz / pitch_hz)))
        tone = ring(rub, hz, 0.74 * t60)
        hollow += share * tone / tone.std()
        power += share ** 2
    deep = noise(shape(DEEP_COLOUR), alike_hz=460)
    return undb(hollow_db) * hollow / np.sqrt(power) + undb(deep_db) * deep


def drone(swell_db=11, edge_s=0.14):
    """A deep tone fades in, swells, holds and fades out."""
    out = 0
    for start_s, full_s, stop_s, hz, db in DRONE_SPANS:
        edges = np.clip(np.minimum(T - start_s, stop_s - T) / edge_s, 0, 1)
        swell = undb(db - swell_db * np.clip((full_s - T) / (full_s - start_s), 0, 1))
        out += edges * swell * np.sqrt(2) * np.sin(2 * np.pi * hz * T)
    return out


def room(hum_hz=136.6):
    """A low wash of noise, a wavering hum, and a thin whine that jumps up and then sinks back."""
    waver = noise(bump(hum_hz, width_hz=10.5), alike_hz=570)
    hum = 0.6 * waver + 1.84 * np.sin(2 * np.pi * hum_hz * T)
    whine = sum(np.sqrt(2) * undb(db) * np.sin(2 * np.pi * hz * T) for hz, db in WHINE_TONES)
    whine *= np.interp(T, [1.19, 1.2, 2.2, 2.3], [0.088, 1.0, 0.32, 0.22])
    wash = noise(shape(ROOM_COLOUR), alike_hz=490)
    return undb(-54.5) * wash + undb(-55.5) * hum + whine


def undb(db):
    """Turn dB into a number to multiply by (a gain)."""
    return 10 ** (np.asarray(db) / 20)


def shape(points):
    """Gain at every frequency, from rows of Hz and dB."""
    hz, db = np.transpose(points)
    return undb(np.interp(np.log(HZ), np.log(hz), db))


def bump(hz, width_hz):
    """Gain that is 1 at one frequency and falls away on both sides."""
    return 1 / (1 + ((HZ - hz) / width_hz * 2) ** 2)


def noise(colour, alike_hz):
    """Coloured noise whose left and right are alike below alike_hz and unrelated above."""
    mid, side = rfft(rng.standard_normal((2, N))) * colour
    share = 1 / np.sqrt(1 + (alike_hz / HZ) ** 2)
    out = irfft(np.array([mid + share * side, mid - share * side]) / np.sqrt(1 + share ** 2), N)
    return out / out.std()


def curves(*tables):
    """Join tables whose rows begin with a time; give each other column one value per sample."""
    seconds, *columns = np.transpose(np.vstack(tables))
    return [np.interp(T, seconds, column) for column in columns]


def ring(push, hz, t60):
    """One tone that rings when pushed and then fades."""
    pole = np.exp(2j * np.pi * hz / SR - np.log(1000) / (t60 * SR))
    return signal.lfilter([1], [1, -pole], push).imag


def scene():
    """All the sources together, left and right."""
    return film() + ticks() + knocks() + drag() + room() + drone()


def record(dry, bass_cut_hz=58, one_port_hz=6760, lag_s=0.0001548, top_hz=15900):
    """The phone's ports colour the sound unequally; the left one feeds the high treble to both sides."""
    tilt = np.sqrt(shape(PORT_BALANCE))
    bass_loss = np.sqrt(1 + (bass_cut_hz / HZ) ** 6)  # the microphones lose the deepest bass
    left, right = rfft(dry) * np.array([tilt, 1 / tilt]) / bass_loss
    from_left = 1 / (1 + (one_port_hz / HZ) ** 12)
    late_left = left * np.exp(-2j * np.pi * HZ * lag_s)
    right = np.sqrt(1 - from_left) * right + np.sqrt(from_left) * late_left
    # the level dips briefly and comes back a little lower
    dip_times = [DIP_START_S - 0.004, DIP_START_S, DIP_END_S, DIP_END_S + 0.0029]
    out = irfft(np.array([left, right]), N) * np.interp(T, dip_times, [0.82, 0.015, 0.054, 0.68])
    top_cut = signal.ellip(10, 0.2, 80, top_hz, fs=SR, output="sos")
    return signal.sosfilt(top_cut, out)


dry = scene()
out = record(dry)
to_wav(out)
```